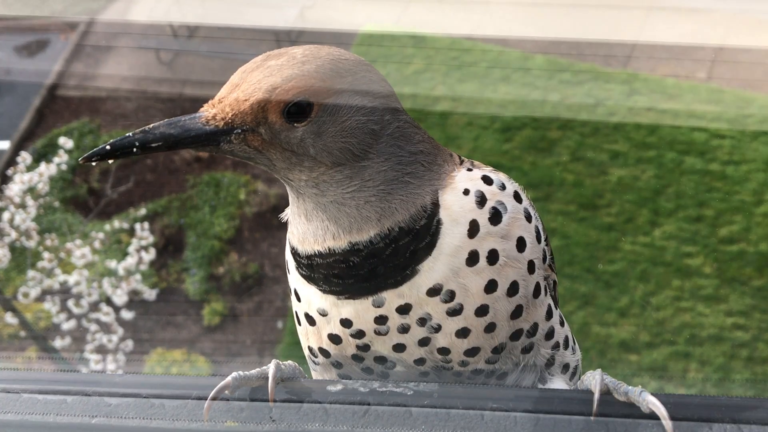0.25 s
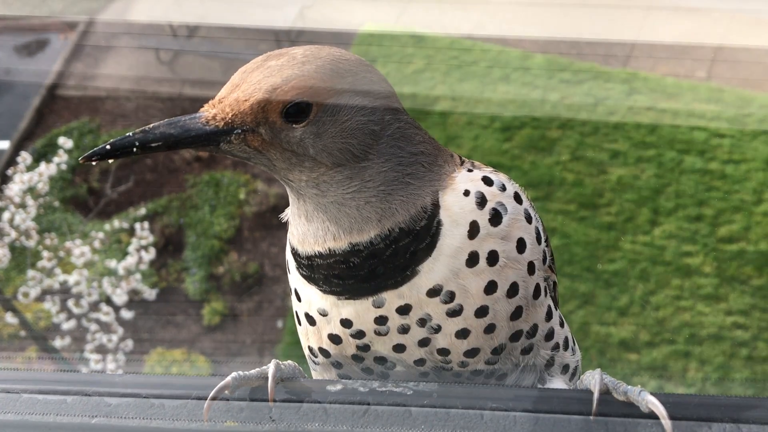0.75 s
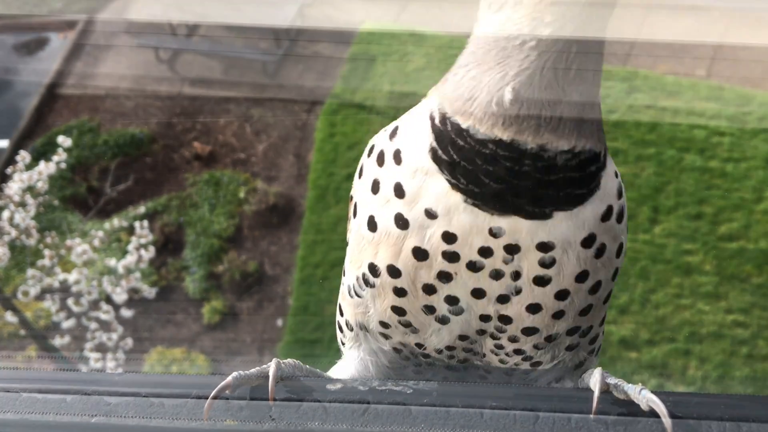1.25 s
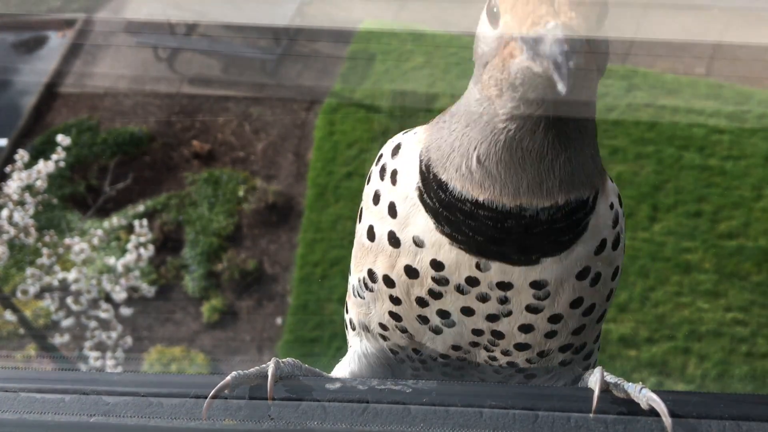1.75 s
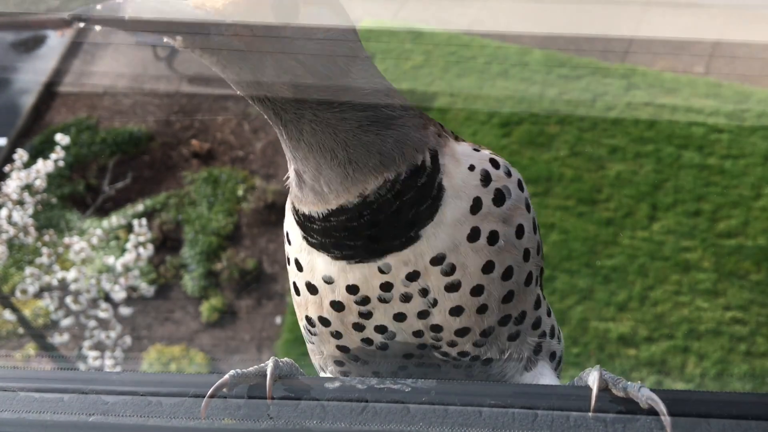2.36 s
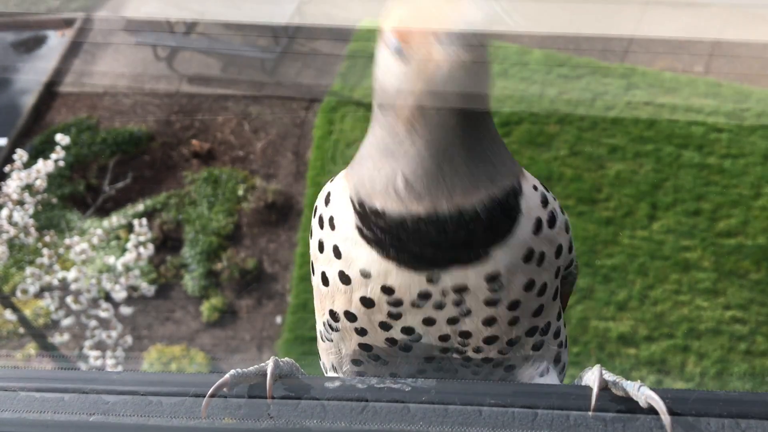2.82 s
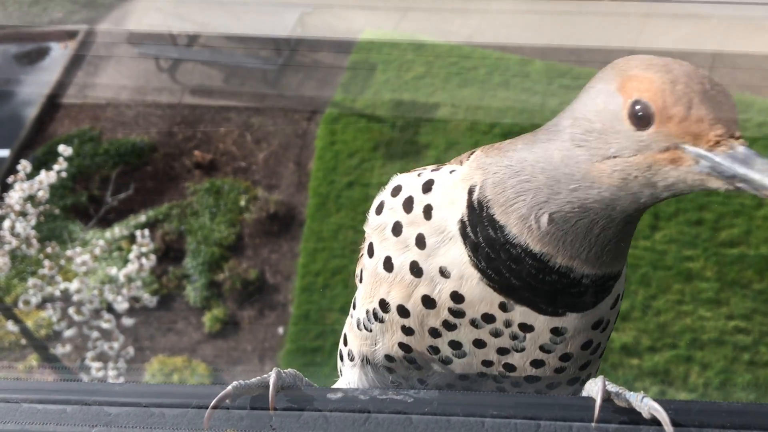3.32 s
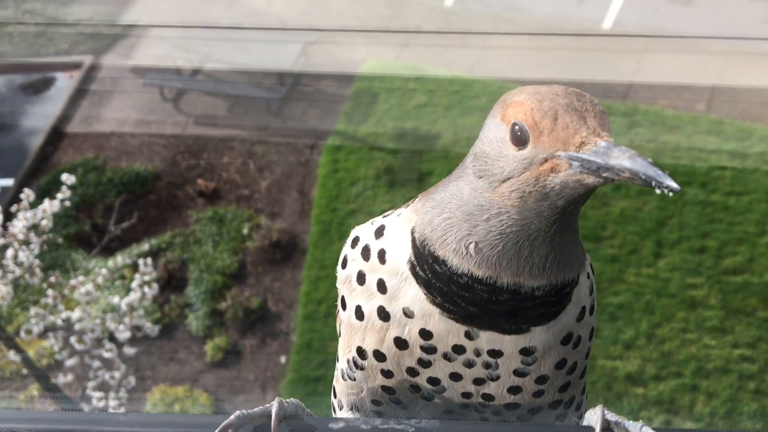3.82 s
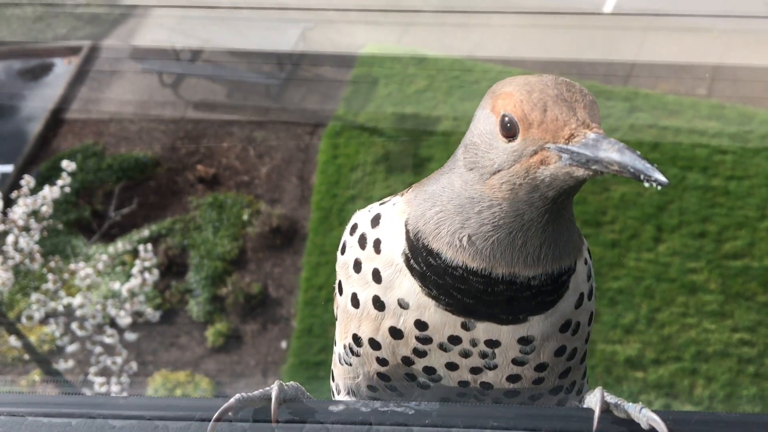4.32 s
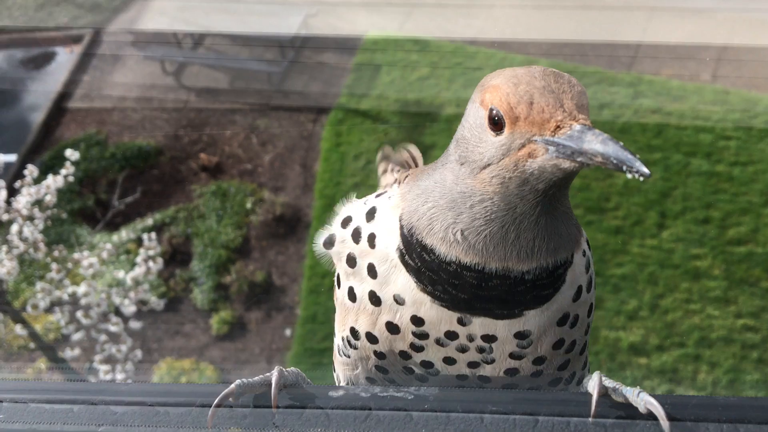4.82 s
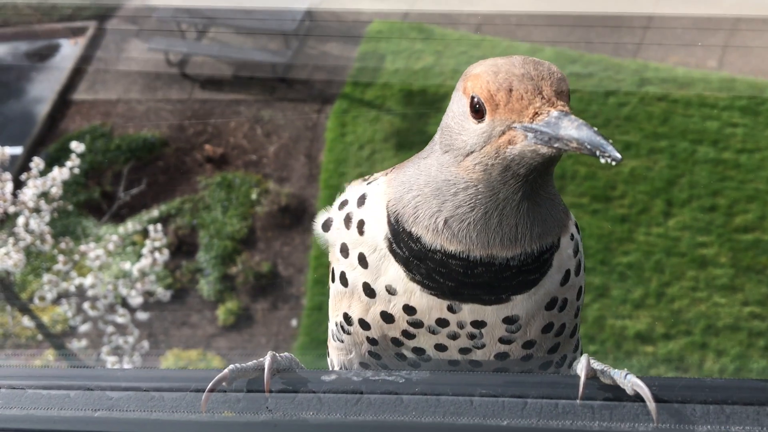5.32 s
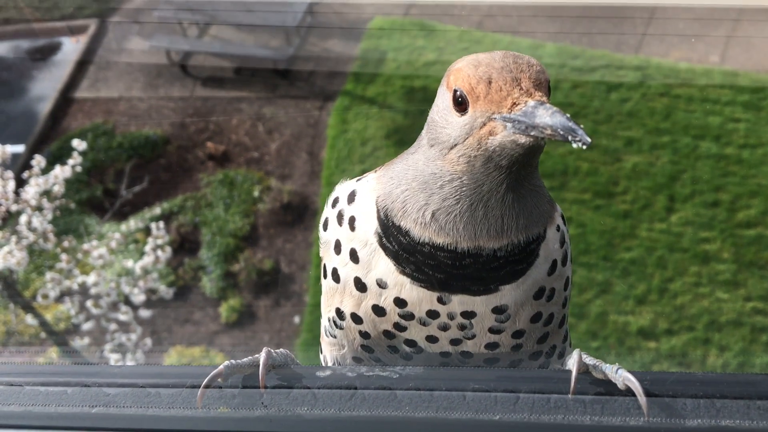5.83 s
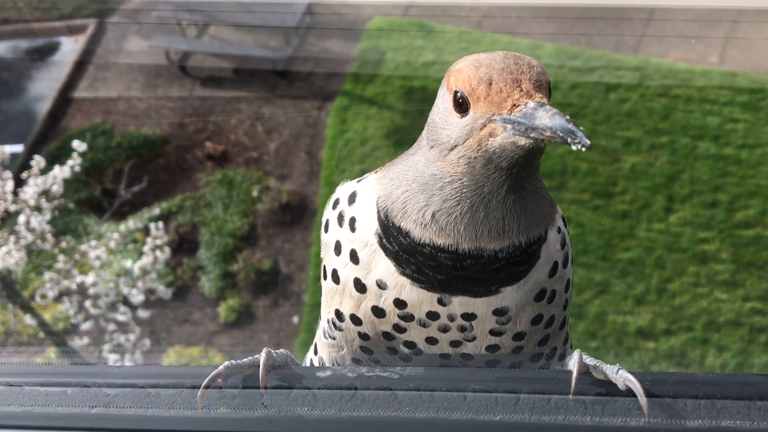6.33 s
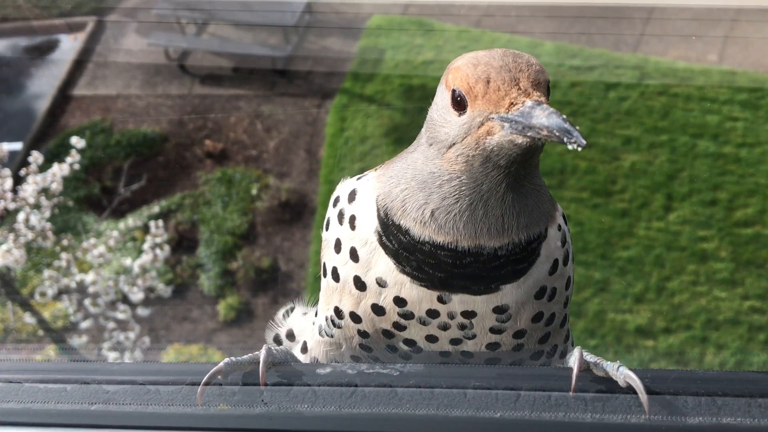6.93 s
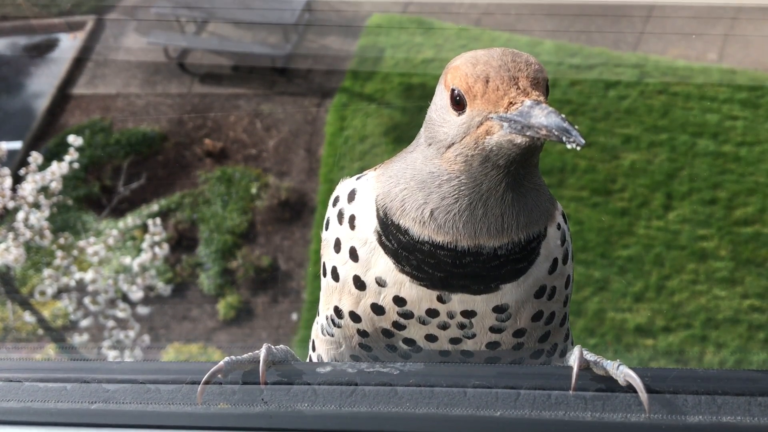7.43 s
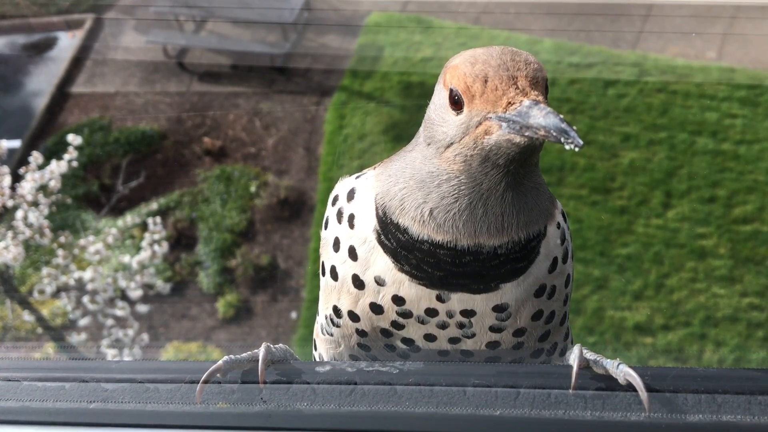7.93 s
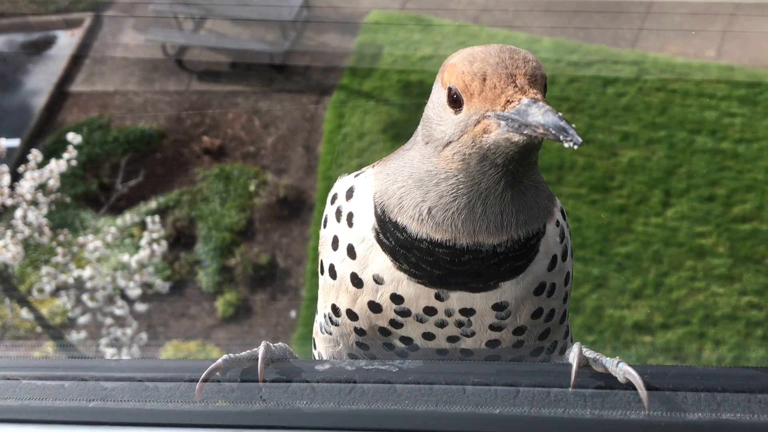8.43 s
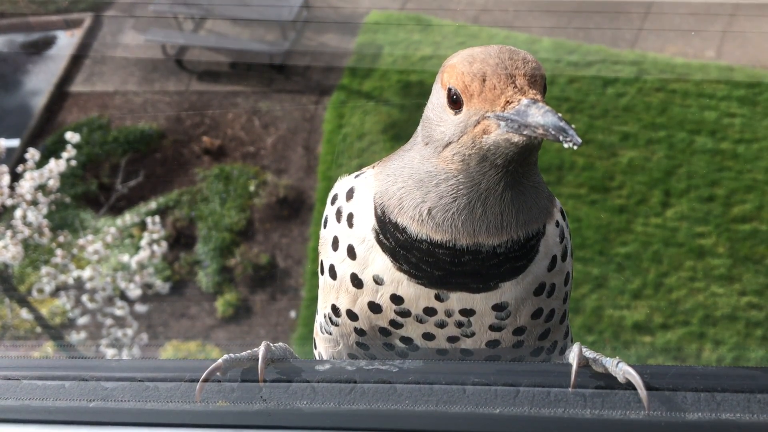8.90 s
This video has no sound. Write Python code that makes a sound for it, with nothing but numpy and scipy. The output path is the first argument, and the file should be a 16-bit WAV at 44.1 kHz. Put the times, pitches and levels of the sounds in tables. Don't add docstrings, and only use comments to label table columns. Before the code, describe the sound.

Quiet room with low air rumble; dulled bird clucks through glass, a quick flurry of sharp pane ticks, then two hollow knocks and sparse taps.

```python
import sys
import numpy as np
from scipy import signal
from scipy.fft import rfft, irfft
from scipy.io import wavfile
from scipy.ndimage import uniform_filter1d, map_coordinates

SR = 44100
rng = np.random.default_rng(int(sys.argv[2]) if len(sys.argv) > 2 else 0)


def how_loud(loudness_db):
    steps = np.asarray(loudness_db, float) / 20
    return 10 ** steps


def dump_mix(stems):
    frames = np.atleast_2d(stems).T
    limited = np.clip(frames, -1, 1)
    pcm = np.round(limited * 32767).astype(np.int16)
    wavfile.write(sys.argv[1], SR, pcm)


N = 403956
SPAN = 16384
PECK_ATTACK_S = 0.0009

# (centre [Hz], width [Hz], level [dB])
PANE = [(542, 510, 2), (712, 1230, -2.5), (1000, 290, -2), (1206, 220, 1)]
# (frequency [Hz], density [dB per Hz])
SCRATCH = [(2600, -15), (3400, -2), (7500, -1), (9600, -1), (10500, -8), (12000, 1.5), (15500, -8),
           (16500, -30)]
# (time [s], click peak [dB], pane [dB], frame [dB])
FLURRY = [(4.7698, -39, -51, -56), (4.8088, -56, -53, -60.5), (4.869, -62, -73, -84),
          (4.988, -61, -61, -73), (5.0048, -46.5, -46.5, -57.5), (5.036, -52, -54, -61),
          (5.0635, -40.5, -53, -53.5), (5.236, -39.5, -50, -53), (5.2654, -43, -54, -58),
          (5.293, -41, -48.5, -53), (5.3135, -36, -55, -55), (5.3725, -57, -66, -63),
          (5.445, -58, -65, -67), (5.5252, -43, -69, -56.5), (5.5653, -27, -38, -44.5),
          (5.5702, -23.5, -39, -40.5), (5.575, -26, -62, -58.5), (5.5883, -49, -49, -57),
          (5.637, -37.5, -50, -52)]


def unit(x):
    return x / np.sqrt(np.mean(x ** 2, axis=-1, keepdims=True) + 1e-20)


def noise_like(*shape):
    return rng.standard_normal(shape)


def curves(rows):
    s, *cols = np.transpose(rows)
    return [np.interp(np.arange(N) / SR, s, c, left=-120, right=-120) for c in cols]


def wobble(rate):
    return map_coordinates(noise_like(int(N * rate / SR) + 4), [np.arange(N) * rate / SR])


def coloured(x, gain):
    m = x.shape[-1]
    return unit(irfft(rfft(x) * gain(np.fft.rfftfreq(m, 1 / SR)), m))


def spectrum(points):
    f, db = np.transpose(points)
    return lambda hz: how_loud(np.interp(np.log(hz + 1), np.log(f), db))


def modes(rows, scatter_db=0, count=1):
    luck = scatter_db * noise_like(count, len(rows), 1)

    def gain(f):
        power = 0
        for k, (centre, wide, db) in enumerate(rows):
            one = (f * wide) ** 2 / ((centre * centre - f * f) ** 2 + (f * wide) ** 2)
            power = power + how_loud(db + luck[:, k]) ** 2 * one ** 2
        return np.sqrt(power)

    return gain


def placed(times, sounds):
    where = np.round(np.asarray(times) * SR).astype(int)[:, None] + np.arange(SPAN)
    return np.bincount(where.ravel(), sounds.ravel(), N + SPAN)[:N]


def filled(shape, x):
    return unit(shape * x) * np.sqrt(np.mean(shape ** 2, axis=-1, keepdims=True))


def bursts(times, db, body, attack, hold, t60, tail_db, tail_t60, grit_db):
    t = np.arange(SPAN) / SR
    after = np.maximum(t - hold, 0)
    decay = how_loud(-60 * after / np.reshape(t60, (-1, 1)))
    shape = np.minimum(t / attack, 1) * (decay + how_loud(tail_db - 60 * after / tail_t60))
    noise = noise_like(len(times), 2, SPAN)
    grit = how_loud(grit_db * unit(uniform_filter1d(noise[:, 1], size=40)))
    return placed(times, how_loud(db)[:, None] * filled(shape, grit * coloured(noise[:, 0], body)))


def air():
    # (time [s], level [dB])
    rumble_level = [(0.0, -49.5), (0.23, -51.5), (1.53, -51.5), (1.55, -54), (1.6, -45), (2.04, -56.5),
                    (2.45, -49), (5.81, -51.5), (6.25, -48), (6.3, -65), (6.38, -43.5), (6.73, -50),
                    (6.91, -55.5), (7.06, -48), (8.67, -52), (8.75, -72), (8.85, -43), (9.16, -54.5)]
    # (frequency [Hz], density [dB per Hz])
    rumble_colour = [(12, -50), (20, -16), (35, -12), (54, 8.5), (68, 4), (86, -9.5), (95, -16),
                     (120, -55.5), (210, -120)]
    duct_colour = [(50, -22.5), (85, -1.5), (129, 0), (204, -8), (221, -6), (238, -2), (306, -12),
                   (373, -14.5), (409, -19.5), (443, -33.5), (480, -24.5), (620, -60), (1060, -120)]
    rush_colour = [(250, -43), (420, -10), (446, -1), (794, -11.5), (910, -9), (1020, -12), (1100, -9),
                   (1180, -16.5), (1300, -13.5), (1590, -17.5), (1860, -16.5), (2680, -22.5), (3200, -25.5),
                   (4160, -57), (7040, -120)]
    rumble_db, = curves(rumble_level)
    rumble = how_loud(rumble_db) * coloured(noise_like(N), spectrum(rumble_colour))
    duct = how_loud(-55 + 0.22 * wobble(1.413)) * coloured(noise_like(N), spectrum(duct_colour))
    rush = how_loud(-71.5 + 1.07 * wobble(1.159)) * coloured(noise_like(N), spectrum(rush_colour))
    return rumble + duct + rush


def draught():
    # (start [s], length [s], level [dB], pitch [Hz], breathiness [0-1])
    whistles = [(4.77, .06, -72, 1900, 0.35), (5.01, .11, -69, 1880, .2), (5.19, .05, -78, 1880, .4),
                (5.23, 0.13, -70, 1900, .2), (5.34, .1, -76, 1840, .2), (5.527, 0.037, -68, 1880, .2),
                (5.58, 0.11, -65, 1873, .15), (5.715, .055, -77, 1830, 0.3), (5.85, .05, -79, 1830, .3),
                (2.85, .09, -82, 1630, 0.35), (6.256, .41, -79, 1690, 0.8), (8.3, .24, -87, 1840, .7),
                (8.8, 0.21, -83, 1880, .25), (9.0, .16, -85, 1810, .4)]
    t = np.arange(N) / SR
    breath = coloured(noise_like(N), lambda hz: hz < 150)
    waver = 0.01 * np.cumsum(noise_like(N))
    total = np.zeros(N)
    for start, length, db, hz, airy in whistles:
        swell = np.sin(np.pi * np.clip((t - start) / length, 0, 1)) ** 0.27
        tone = (1 - airy + airy * breath) * np.cos(2 * np.pi * hz * t + waver)
        total += how_loud(db) * filled(swell, tone)
    return total


def clucks():
    # (time [s], note peak [dB], start pitch [Hz], end pitch [Hz], upper mode [dB])
    cluck_calls = [(1.086, -71, 1280, 1510, -14), (1.273, -61.5, 1576, 930, -8),
                   (1.503, -60.5, 952, 1694, -12), (1.676, -60, 1200, 927, -7),
                   (1.908, -58.5, 1000, 1220, -9.5), (2.079, -60, 1006, 954, -5.5),
                   (2.273, -63.5, 940, 1050, -6), (2.435, -59.5, 1340, 850, -17),
                   (2.533, -63, 962, 896, -23), (2.644, -59, 913, 1050, -10.5),
                   (2.804, -62, 1036, 980, -4.5), (3.031, -63.5, 1056, 1000, -13),
                   (3.178, -61, 1190, 968, -5), (3.385, -62, 986, 1030, -5), (3.549, -70, 1096, 1305, -2)]
    s, db, start_hz, end_hz, upper_db = np.transpose(cluck_calls)
    s = s - 0.006
    t = np.arange(SPAN) / SR
    pitch = end_hz[:, None] + (start_hz - end_hz)[:, None] * np.maximum(1 - t / 0.04, 0)
    hoarse = 1 + 0.72 * coloured(noise_like(*pitch.shape), lambda hz: hz < 160)
    swell = np.sin(np.pi * np.minimum(t / 0.043, 1))
    swell = swell + 0.13 * np.exp(-t / 0.04) * np.minimum(t / 0.018, 1)
    voice = hoarse * np.sin(2 * np.pi * np.cumsum(pitch, axis=1) / SR)
    note = placed(s, how_loud(db - 7)[:, None] * filled(swell, voice))

    soft = dict(attack=0.0052, hold=0.022, t60=0.07, tail_db=-11, tail_t60=0.3, grit_db=0.8)
    low = bursts(s, db - 10.5, modes([(1044, 280, 0)]), **soft)
    upper = bursts(s + 0.004, db + upper_db - 5.5, modes([(1900, 300, 0)]), 0.0026, 0.013, 0.074,
                   tail_db=-8, tail_t60=0.35, grit_db=-1.0)
    airy_db = -22 + 24 * np.minimum(np.abs(end_hz - start_hz) / 250, 1)
    airy = bursts(s + 0.01, db + airy_db - 15, modes([(1350, 550, 0)]), **soft)
    return note + low + upper + airy


def scrape():
    # (time [s], level [dB])
    drag = [(4.75, -69), (4.86, -77), (5.05, -67), (5.11, -74), (5.22, -60.5), (5.32, -65), (5.454, -86),
            (5.54, -58.5), (5.9, -91)]
    press_db, = curves(drag)
    scratch = how_loud(press_db - 7.5 + 2.3 * wobble(83)) * coloured(noise_like(N), spectrum(SCRATCH))
    rub = how_loud(press_db - 4 + 3.1 * wobble(45)) * coloured(noise_like(N), modes(PANE))[0]
    return scratch + rub


def dabs():
    # (time [s], peak [dB], centre [Hz])
    body_dabs = [(1.953, -55, 730), (2.057, -57, 810), (2.988, -59, 580), (3.654, -60.5, 1050),
                 (4.6525, -55, 900), (5.005, -56, 730), (6.659, -56.5, 690), (6.769, -57, 730),
                 (5.567, -41.5, 1250), (8.667, -59, 910), (7.248, -43, 180), (7.249, -48, 2100),
                 (6.217, -58, 1400), (6.657, -62, 2400), (5.934, -47, 1650), (5.938, -51, 3300),
                 (8.698, -65, 2100), (5.417, -66, 1200), (5.312, -55, 1140), (5.237, -57, 930)]
    s, db, hz = np.transpose(body_dabs)
    push = modes([(hz[:, None], 0.41 * hz[:, None], 0)])
    return bursts(s, db - 5, push, 0.00068, 0.0059, 0.067, tail_db=-21, tail_t60=0.2, grit_db=1.0)


def thuds():
    # (time [s], peak [dB])
    blows = [(1.953, -47.5), (3.018, -53), (4.653, -49), (5.235, -43.5), (5.312, -46.5), (5.568, -38),
             (6.214, -45.5), (6.657, -46.5), (6.766, -56)]
    # (centre [Hz], width [Hz], level [dB])
    flex = [(231.5, 90, -5), (295, 140, 5), (353, 78, 4.5)]
    s, db = np.transpose(blows)
    return bursts(s, db - 6.5, modes(flex), 0.006, 0.0047, 0.28, tail_db=-26.0, tail_t60=0.33, grit_db=2.5)


def hollow_ring(rows):
    t = np.arange(SPAN) / SR
    total = np.zeros(SPAN)
    for hz, db, t60 in rows:
        unsteady = 0.014 * np.cumsum(noise_like(SPAN))
        total += how_loud(db - 60 * t / t60) * np.sin(2 * np.pi * (hz * t + 0.28 * rng.random()) + unsteady)
    return total


def knocks():
    # (time [s], peak [dB])
    hollow_knocks = [
        (5.932, -31),
        (7.249, -18),
    ]
    # (frequency [Hz], level [dB], t60 [s])
    rail = [(1093, 13, 0.028), (1620, -4, 0.12), (1760, -2, 0.13), (1770, -9, 0.14), (1860, -8, 0.15),
            (2003, -4.5, 0.2), (2035, -11, 0.2), (2067, -10, 0.27), (2213, -18, 0.33), (2240, -13, 0.3),
            (2363, -14, 0.26), (1960, -8, .14), (2120, -7, .26), (1680, -5, .1)]
    sill = [(202, -8, 0.23), (253.5, -7, 0.32), (283, 3, 0.091), (307.4, -6, 0.29), (380, -10, 0.25),
            (514, -3, 0.056), (560, -14, 0.07), (915, -12, 0.097), (1040, -7.5, .08), (1365, -10, 0.067),
            (1810, -13, .04), (2700, -13, 0.046)]
    # (centre [Hz], width [Hz], level [dB], t60 [s])
    rattle = [(1780, 330, -20.5, .24), (2060, 260, -29, .3), (3100, 900, -27, .22), (7000, 3500, -33, .16),
              (4080, 400, -28.5, 0.16)]
    t = np.arange(SPAN) / SR
    s, db = np.transpose(hollow_knocks)
    onset = 1 - np.exp(-t / 0.003)
    total = placed(s, how_loud(db - 14.5)[:, None] * [hollow_ring(rail), hollow_ring(sill)] * onset)
    for hz, wide, level_db, t60 in rattle:
        total += bursts(s[:1], db[:1] + level_db, modes([(hz, wide, 0)]), 0.004, 0.011, t60,
                        tail_db=-30, tail_t60=0.4, grit_db=2.0)
    return total


def bead():
    s, _, _, frame_db = np.transpose(FLURRY)
    return bursts(s, frame_db - 22.5, modes([(1880, 150, 0)]), 0.003, 0.03, 0.22,
                  tail_db=-28, tail_t60=0.5, grit_db=-1.0)


def contacts():
    # (time [s], click peak [dB], pane [dB], frame [dB])
    pecks = [(0.837, -59, -58, -58.5), (0.877, -53, -59, -55.5), (1.953, -64, -46.5, -64),
             (2.058, -80, -63, -81), (2.9874, -78, -60, -71), (3.0135, -88, -57, -62),
             (3.655, -65, -63, -72), (3.713, -39.5, -49, -58.5), (3.813, -58.5, -63, -72),
             (3.911, -70, -63, -63.5), (4.653, -66, -49, -78), (5.9331, -42.5, -45.5, -44),
             (6.216, -42, -49, -52.5), (6.656, -44, -65, -60), (6.7671, -77, -62, -69),
             (7.248, -35.5, -36.5, -47), (8.6658, -76, -57, -67), (8.6961, -56, -56.5, -58)]
    skids = [(5.053, -47, -50.5, -62), (5.186, -60, -57, -65), (5.2264, -46, -58, -55),
             (5.301, -44, -62, -59), (5.3083, -39, -62, -54), (5.6114, -53, -61, -72),
             (5.6454, -33.5, -55, -68), (5.6532, -42, -49.5, -47)]
    s, db, pane_db, frame_db = np.transpose(pecks + FLURRY + skids)
    hard = np.clip((db - frame_db) / 20, 0, 1)
    return s, db, pane_db, frame_db, hard, np.isin(s, np.transpose(skids)[0])


def window():
    # (centre [Hz], width [Hz], level [dB])
    low_glass = [(3000, 1500, -1.5), (3600, 730, 0.5), (4380, 540, 1)]
    frame_modes = [(1616, 240, -7.5), (1887, 180, 2), (2164, 280, -6), (2540, 370, -12.5)]
    s, click_db, pane_db, frame_db, hard, _ = contacts()
    spot_db = 1.5
    glass_db = 1 + frame_db + 0.26 * (click_db - frame_db)
    t60 = 0.066 + (0.08 - 0.066) * hard
    glass = bursts(s, glass_db - 12, modes(low_glass, spot_db, len(s)), 0.0013, 0.0064, t60,
                   tail_db=-13.5, tail_t60=0.29, grit_db=3.5)
    frame = bursts(s, frame_db - 8.5, modes(frame_modes, spot_db, len(s)), 0.00034, 0.0079, 1.33 * t60,
                   tail_db=-12.5, tail_t60=0.31, grit_db=-4.5)
    pane = bursts(s, pane_db - 9, modes(PANE, spot_db, len(s)), 0.001, 0.00093, 2.28 * t60,
                  tail_db=-11.5, tail_t60=0.24, grit_db=2.0)
    return glass + frame + pane


def rings():
    # (time [s], peak [dB], first mode [Hz], second mode [Hz])
    spot_rings = [(3.718, -56, 2150, 4780), (4.7712, -49, 3530, 5400), (4.809, -55, 2820, 5860),
                  (5.005, -51, 3680, 5400), (5.065, -47, 4500, 9100), (5.238, -50, 3670, 8800),
                  (5.2662, -48, 3640, 5660), (5.2934, -46, 3600, 5370), (5.3124, -45, 4750, 7200),
                  (5.5283, -50, 7600, 9000), (5.527, -51, 3600, 6000), (5.94, -55, 3100, 4150),
                  (5.5703, -28, 8450, 5000), (5.6371, -49, 2700, 7200), (5.652, -41, 4430, 8740),
                  (5.932, -48, 4010, 5510), (6.2165, -46, 4440, 5100), (6.6545, -57, 4540, 8230),
                  (7.2505, -38.5, 3160, 6530), (5.053, -51, 3520, 4500)]
    s, db, low_hz, high_hz = np.transpose(spot_rings)
    ring = dict(attack=0.0013, hold=0.0032, t60=0.051, tail_db=-26, tail_t60=0.2, grit_db=-4.0)
    low = bursts(s, db - 9.5, modes([(low_hz[:, None], 300, 0)]), **ring)
    return low + bursts(s, db - 11.5, modes([(high_hz[:, None], 380, 0)]), **ring)


def snaps():
    # (time [s], peak [dB])
    bare_snaps = [(3.016, -67), (3.6545, -62), (3.7135, -51), (5.3136, -33), (5.2935, -44), (5.2651, -50),
                  (5.5718, -26), (5.5748, -31), (4.809, -60), (5.2362, -46), (5.0646, -47), (5.637, -45),
                  (6.657, -58)]
    s, db = np.transpose(bare_snaps)
    return bursts(s, db - 8.0, spectrum(SCRATCH), 0.0006, 0.00138, 0.012,
                  tail_db=-34.5, tail_t60=0.06, grit_db=3.0)


def pings():
    # (time [s], peak [dB], frequency [Hz], t60 [s])
    tip_pings = [(2.9885, -60, 1500, .015), (3.0155, -55, 2050, .012), (3.016, -66, 3900, .008),
                 (3.6545, -63, 2500, .015), (3.7132, -50, 6600, .05), (3.7133, -55, 5910, 0.071),
                 (3.7135, -52, 12000, .03), (4.6585, -69, 4800, .08), (4.7705, -56, 3530, .1),
                 (4.809, -56, 2400, .012), (4.8097, -58, 3600, .012), (5.053, -55, 3500, .04),
                 (5.0655, -53, 8800, 0.08), (5.2935, -52, 3600, .04), (5.3135, -45, 7250, .06),
                 (5.5265, -52, 4380, .075), (5.5265, -57, 3600, .06), (5.835, -60, 2500, .012),
                 (6.2164, -54, 4480, .04), (6.656, -54, 8260, .07), (6.657, -65, 2910, .05),
                 (5.2365, -55, 3620, .06), (5.2655, -55, 3620, .05), (5.5705, -46, 3640, .07),
                 (5.5705, -45, 4400, .06), (5.3135, -49, 9800, .06), (5.3135, -50, 4750, .05),
                 (8.036, -74, 3400, .04), (7.252, -46, 3250, .08), (8.036, -71, 3550, .05)]
    s, db, hz, t60 = np.transpose(tip_pings)[:, :, None]
    t = np.arange(SPAN) / SR
    unsteady = 0.03 * np.cumsum(noise_like(len(s), SPAN), axis=1)
    shape = how_loud(db - 60 * t / t60) * (1 - np.exp(-t / 0.00053))
    return placed(s[:, 0], shape * np.sin(2 * np.pi * hz * t + unsteady))


def click(s, db, bright_db, t60, attack):
    # (centre [Hz], width [Hz], level [dB])
    upper_glass = [(5460, 670, 1), (6230, 1600, 2), (7080, 820, -0.5), (8510, 2400, 1)]
    bright_edge = [(9500, 1400, -4), (11370, 750, -2), (12200, 520, -1.5), (13400, 1900, -4.5),
                   (14700, 1600, -13)]
    spot_db = 1.5
    glass = bursts(s, db - 10, modes(upper_glass, spot_db, len(s)), attack, attack + 0.0017, t60,
                   tail_db=-35.0, tail_t60=0.26, grit_db=2.2)
    edge = bursts(s, db + bright_db - 4.0, modes(bright_edge, spot_db, len(s)), attack, attack + 0.0028,
                  0.62 * t60, tail_db=-36, tail_t60=0.14, grit_db=-0.8)
    return glass + edge


def ticks():
    # (time [s], click peak [dB], brightness [dB])
    claws = [(2.358, -58, -17), (3.2458, -58, -8), (3.359, -61, -3), (4.59, -56.5, -3.5), (4.732, -68, -4),
             (4.758, -66, -3), (5.72, -70, -2), (5.92, -69, -4), (5.1506, -58.5, -4), (5.4151, -58.5, -7),
             (6.4213, -52, -8), (8.1703, -67.5, -7)]
    s, db, _, _, hard, skid = contacts()
    bright_db = -13 + 4 * hard + 2.5 * skid
    attack = np.where(skid, 0.0052, PECK_ATTACK_S)[:, None]
    soft_t60, hard_t60 = 0.083, 0.034
    bill = click(s, db, bright_db, soft_t60 + (hard_t60 - soft_t60) * hard, attack)
    return bill + click(*np.transpose(claws), 0.055, PECK_ATTACK_S)


def scene():
    background = air() + draught() + clucks()
    body = scrape() + dabs() + thuds() + knocks() + bead()
    strikes = window() + rings() + snaps() + pings() + ticks()
    return (background + body + strikes)[None]


def roll_off(x):
    return signal.sosfilt(signal.butter(12, 16520, fs=SR, output="sos"), x)


def record(dry):
    # (frequency [Hz], density [dB per Hz])
    hiss_colour = [(2500, -45), (3200, 3), (4400, 1), (5000, -2), (5700, 0.5), (9500, -2), (10500, -5.5),
                   (11500, -2), (13500, -4), (14300, -2.5), (16000, -11)]
    hiss_gain = spectrum(hiss_colour)
    hiss = how_loud(-80.5) * coloured(noise_like(N), lambda hz: hiss_gain(hz) * (hz < 15870))
    kept = irfft(rfft(dry) * (np.fft.rfftfreq(N, 1 / SR) < 16300), N)
    return roll_off(kept + hiss)


dry = scene()
out = record(dry)
dump_mix(out)
```